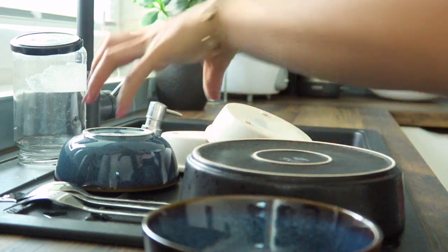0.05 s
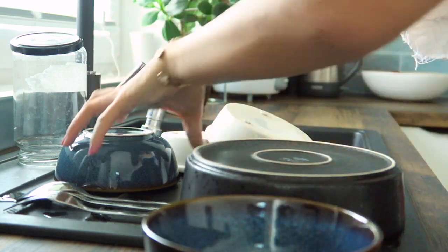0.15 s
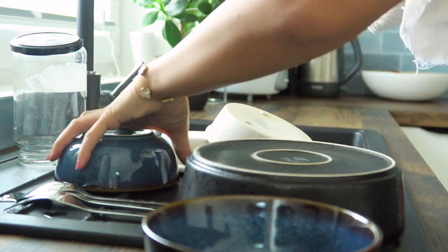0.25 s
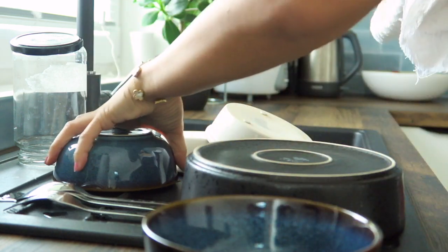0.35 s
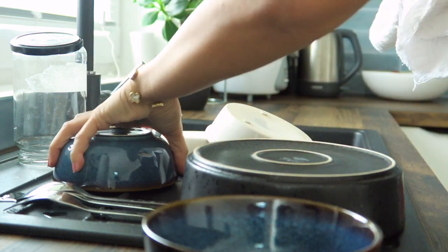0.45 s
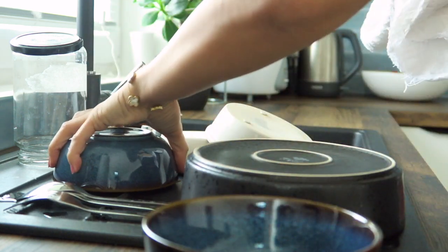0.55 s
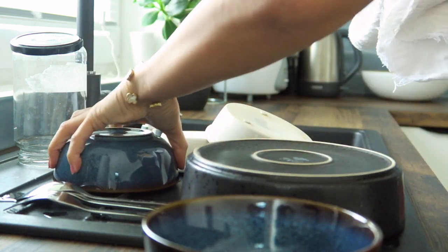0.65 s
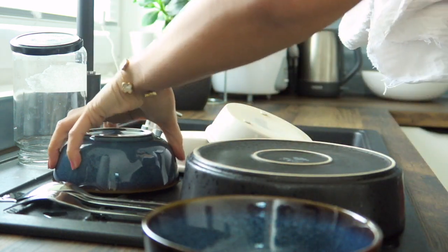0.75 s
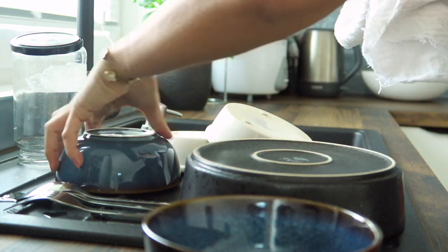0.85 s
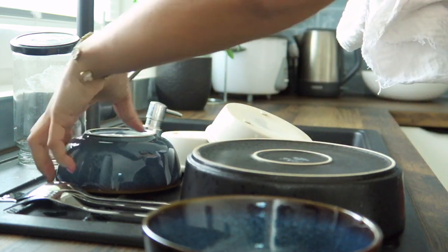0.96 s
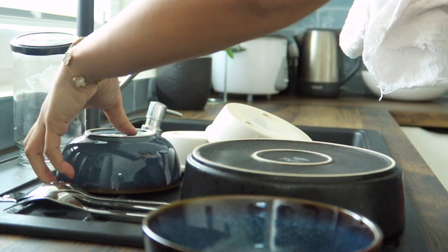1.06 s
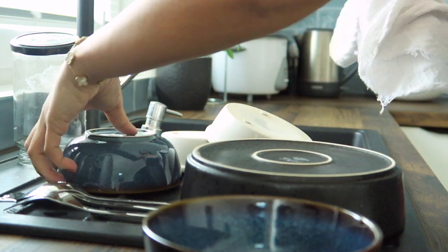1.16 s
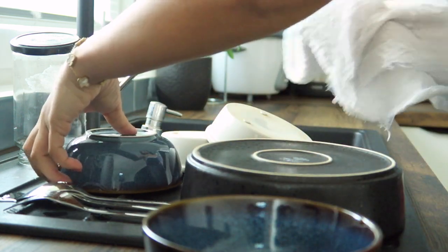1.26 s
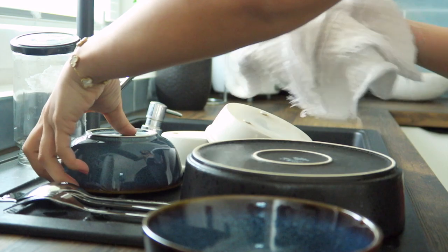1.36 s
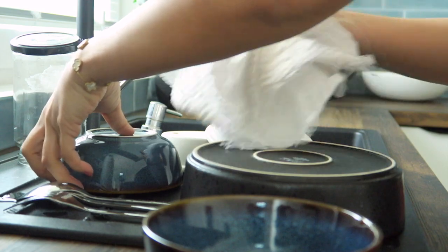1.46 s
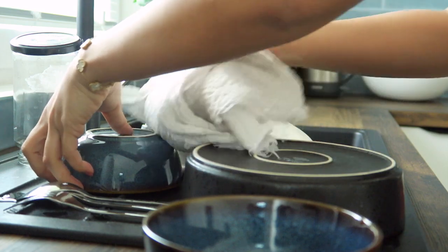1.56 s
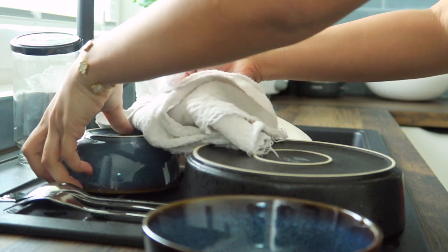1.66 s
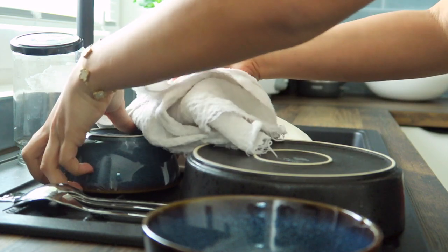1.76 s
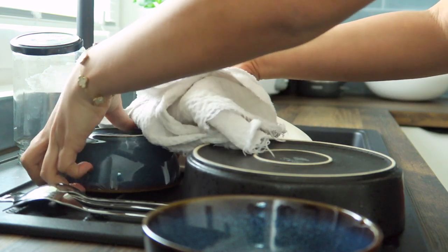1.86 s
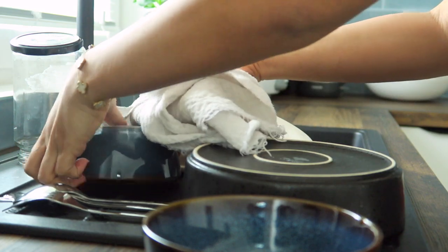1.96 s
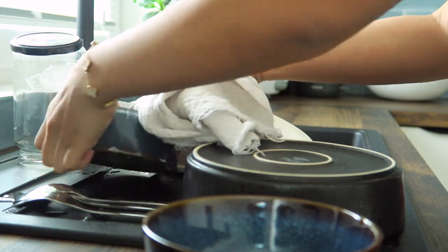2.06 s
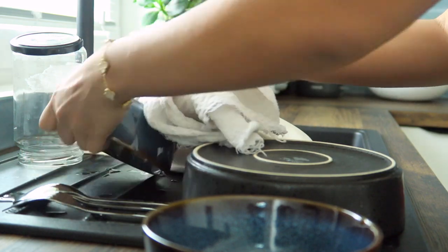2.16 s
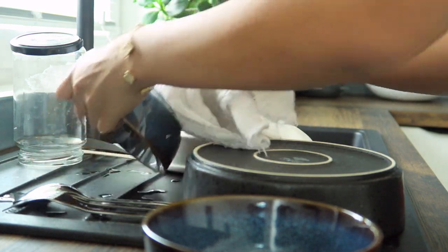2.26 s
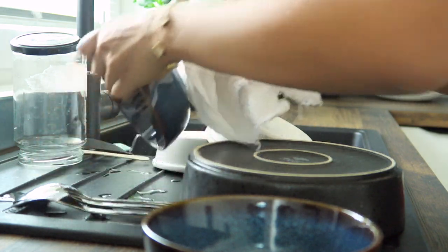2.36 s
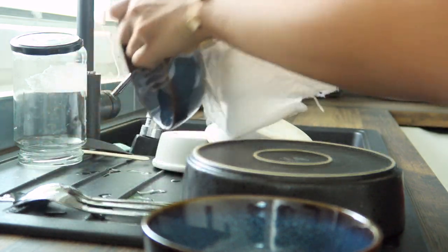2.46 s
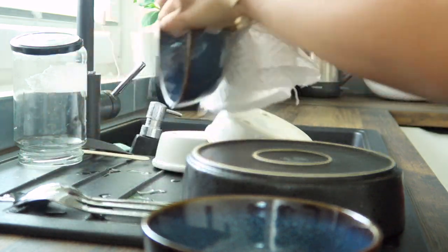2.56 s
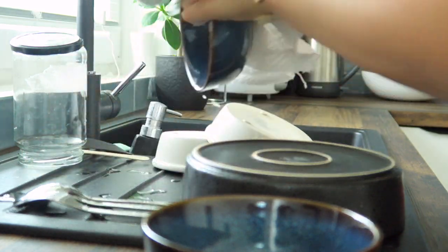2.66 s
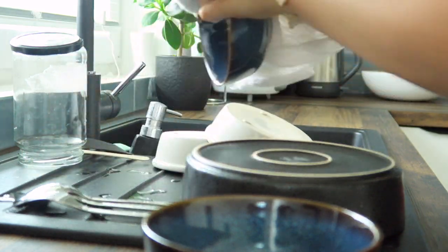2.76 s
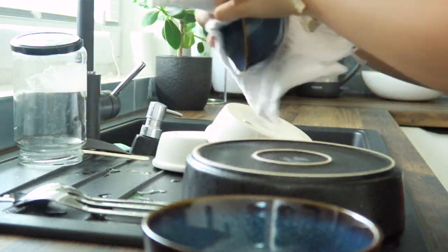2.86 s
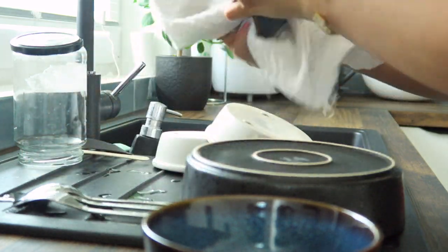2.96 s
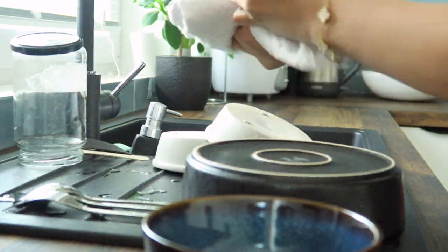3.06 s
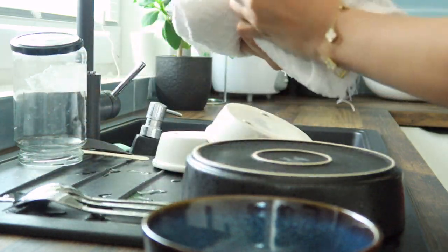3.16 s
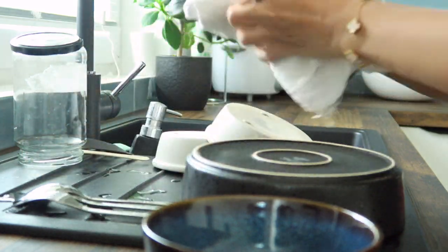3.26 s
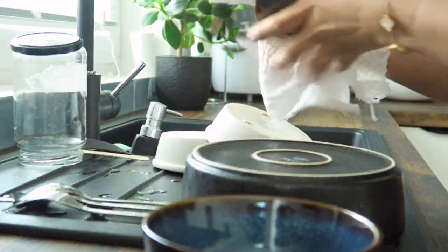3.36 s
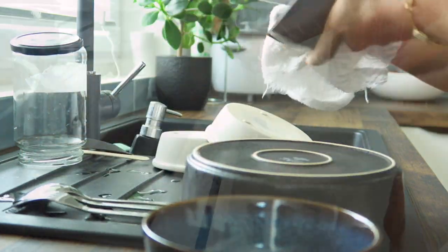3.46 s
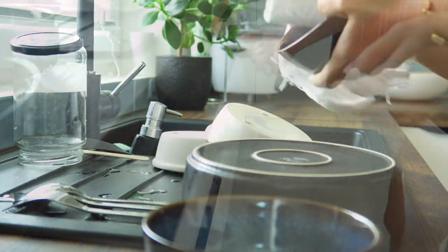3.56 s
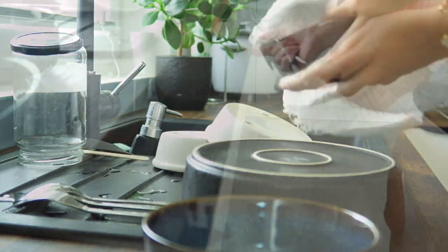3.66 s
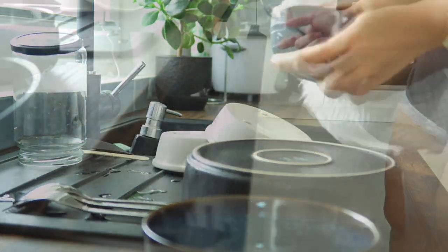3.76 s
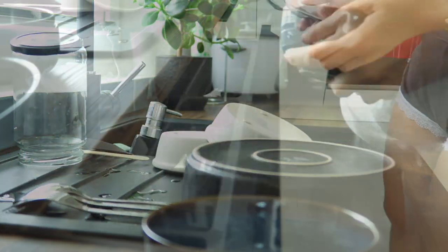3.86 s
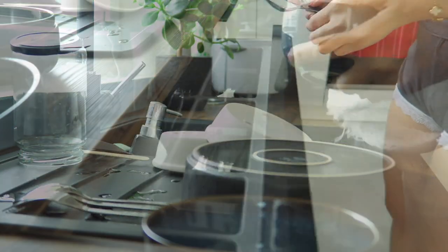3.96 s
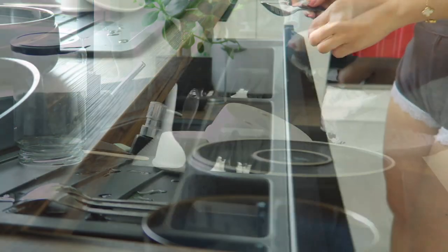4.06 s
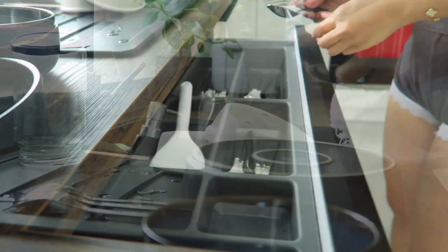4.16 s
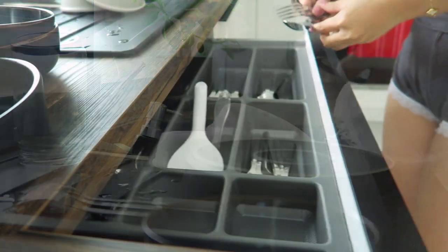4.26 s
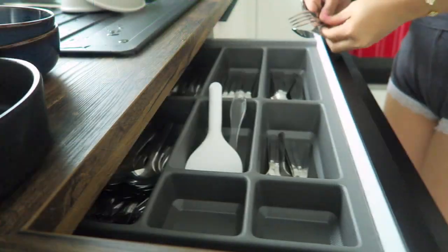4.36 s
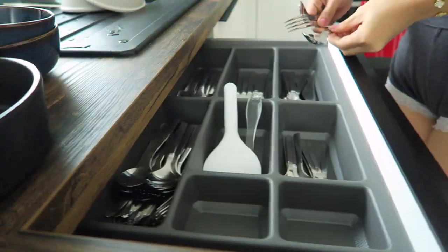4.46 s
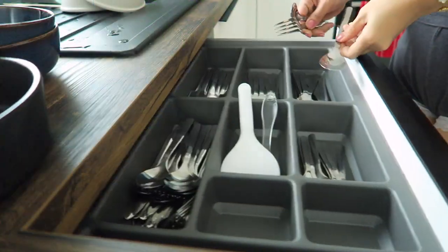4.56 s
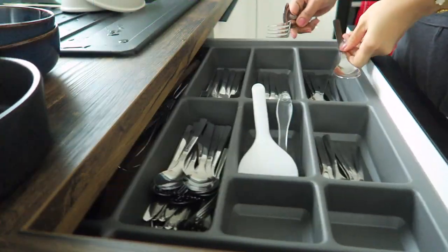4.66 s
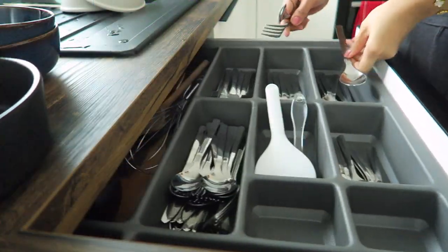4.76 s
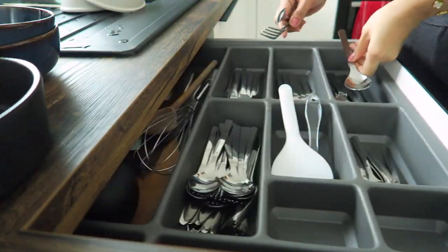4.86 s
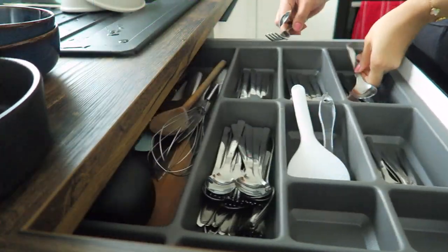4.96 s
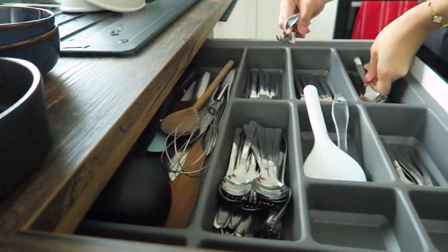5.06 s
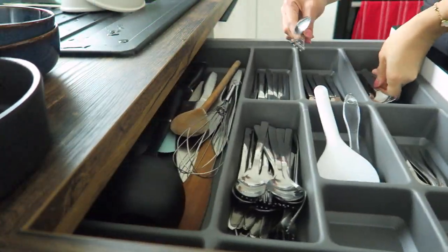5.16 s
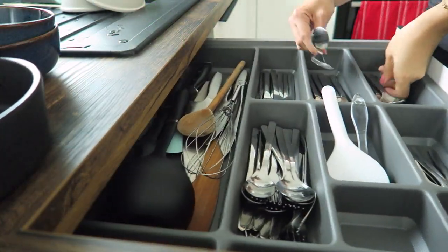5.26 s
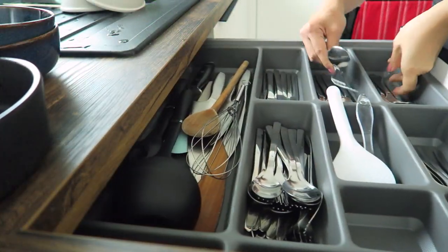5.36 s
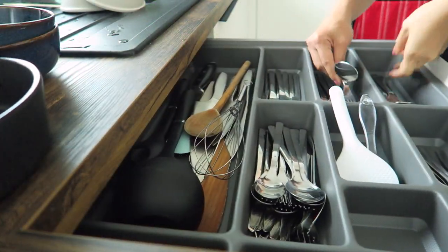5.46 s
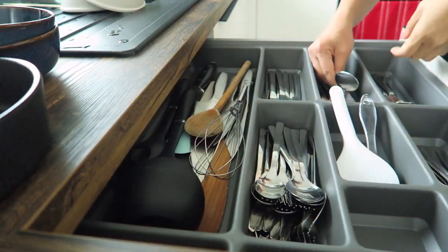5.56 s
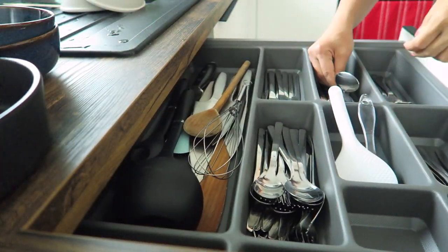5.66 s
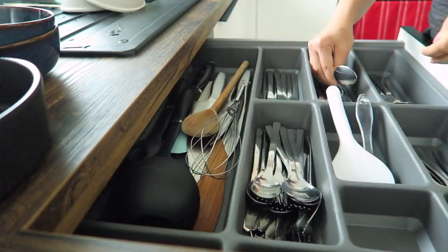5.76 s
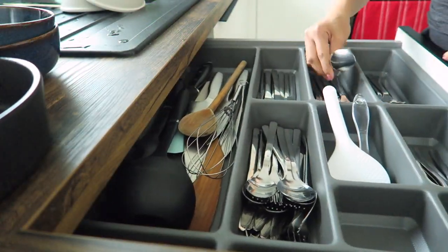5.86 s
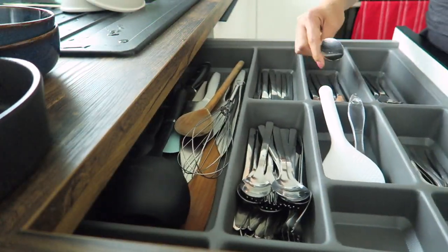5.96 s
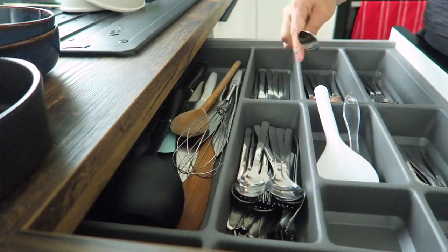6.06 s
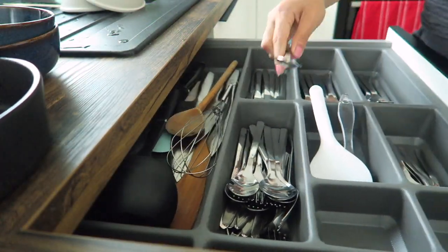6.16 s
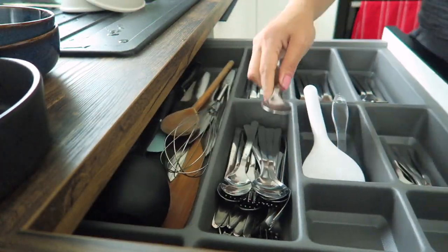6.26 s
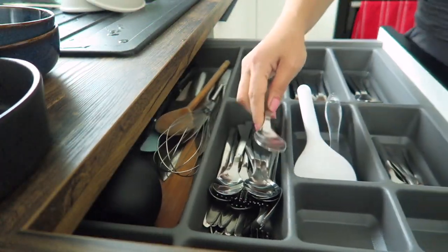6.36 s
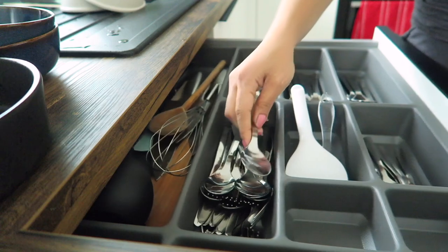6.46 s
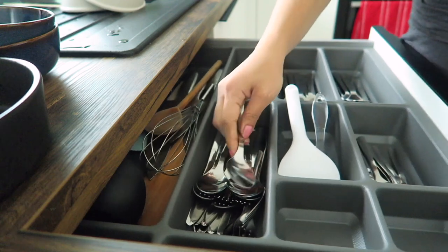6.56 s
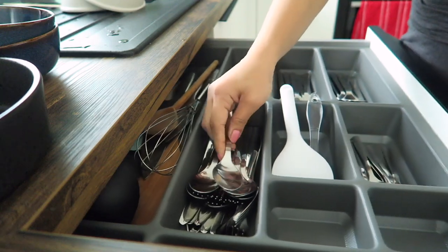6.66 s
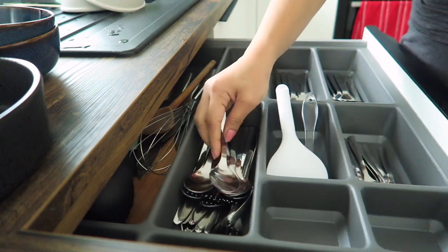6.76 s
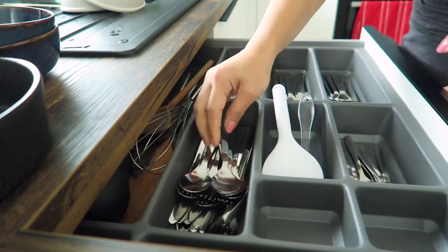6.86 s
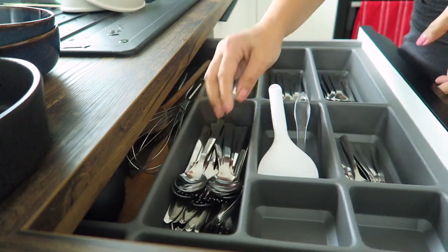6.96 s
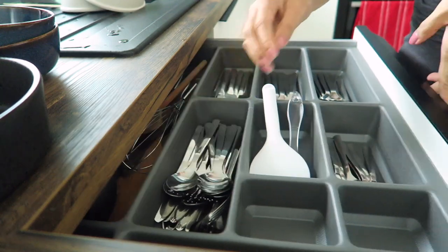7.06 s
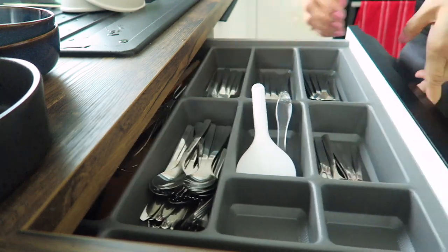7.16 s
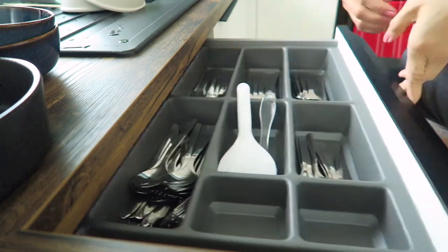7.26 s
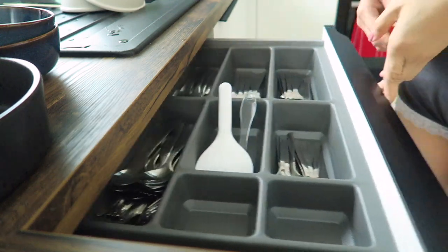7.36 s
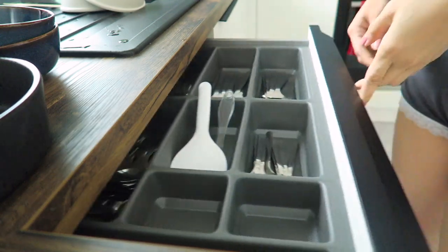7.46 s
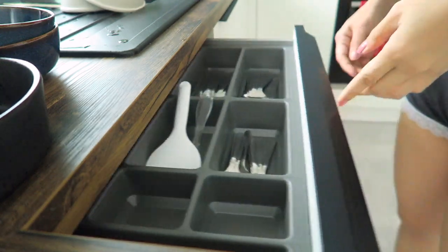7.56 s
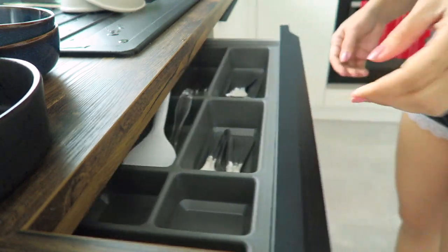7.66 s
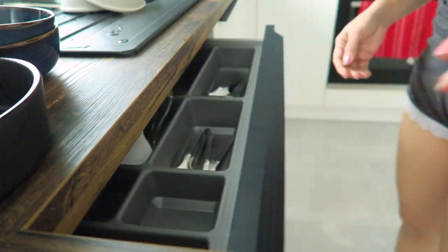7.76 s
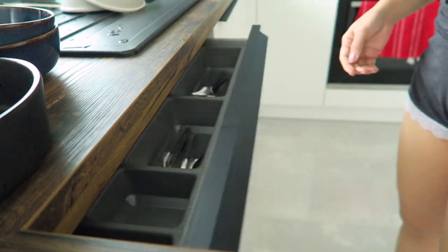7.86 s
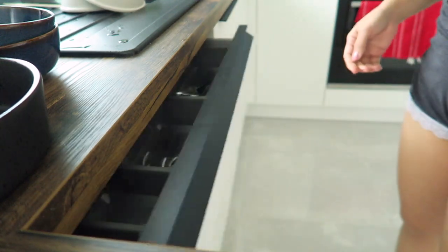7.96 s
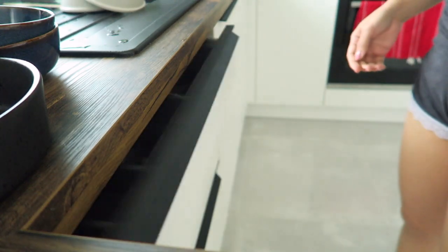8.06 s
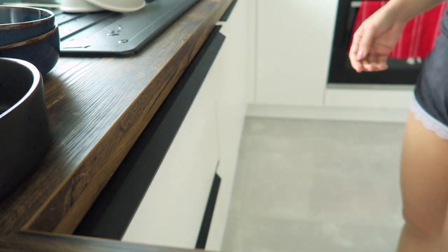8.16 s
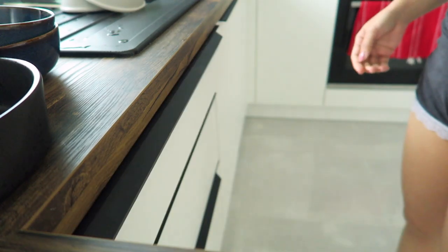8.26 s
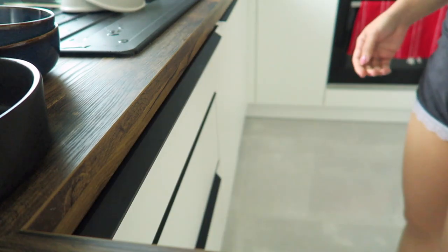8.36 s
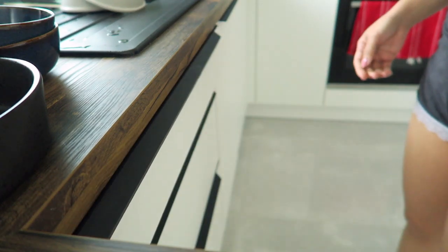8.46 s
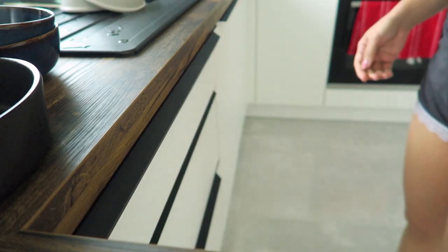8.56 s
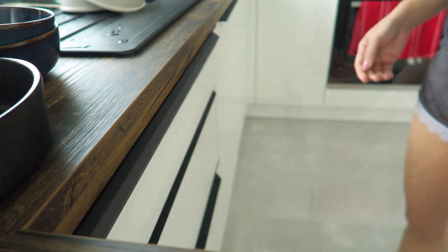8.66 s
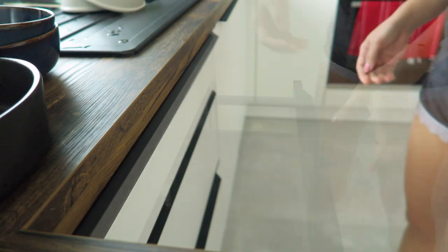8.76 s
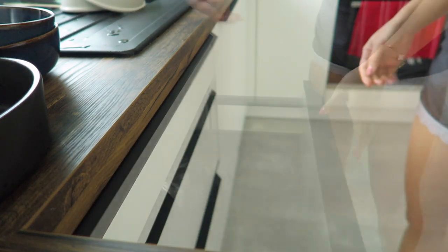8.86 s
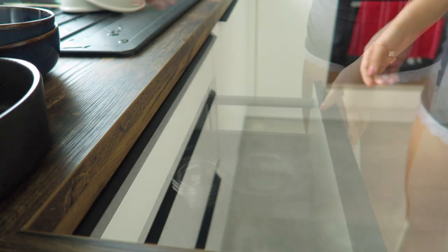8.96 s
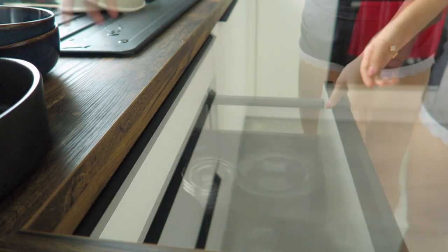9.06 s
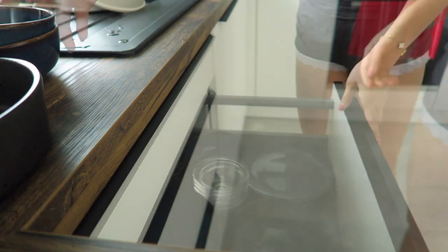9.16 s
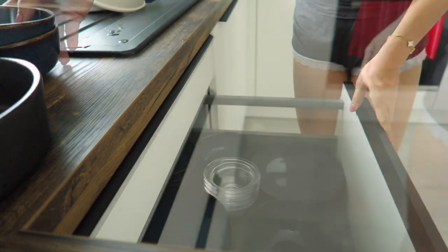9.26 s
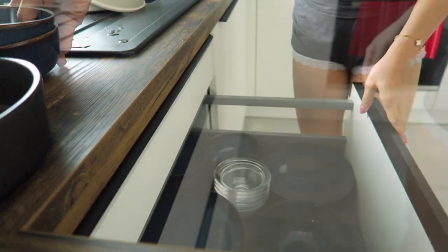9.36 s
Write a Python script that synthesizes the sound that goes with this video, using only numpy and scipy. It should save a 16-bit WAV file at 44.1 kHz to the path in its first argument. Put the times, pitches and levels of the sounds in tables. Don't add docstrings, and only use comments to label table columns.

```python
import sys
import numpy as np
from scipy import signal
from scipy.fft import rfft, irfft, next_fast_len
from scipy.io import wavfile
from scipy.ndimage import uniform_filter1d

SR = 44100
rng = np.random.default_rng(int(sys.argv[2]) if len(sys.argv) > 2 else 0)


def log_audio(samples):
    frames = np.atleast_2d(samples).T
    limited = np.clip(frames, -1, 1)
    pcm = np.round(limited * 32767).astype(np.int16)
    wavfile.write(sys.argv[1], SR, pcm)


def voltage_ratio(decibels):
    exponent = np.asarray(decibels, float) / 20
    return 10 ** exponent


N = 414981

# start_s, level_db (peak), weight_db (lows over it), sparkle_db (highs over it)
BOWL_KNOCKS = [(0.2813, -15.5, 1.5, -61), (0.3424, -37.5, 18.5, -41.5), (0.5531, -7.5, -0.5, -47),
               (0.6194, -29.5, 0.5, -32.5), (0.7362, -9.5, 1.5, -53), (0.8628, -6, 0.5, -42),
               (0.9464, -50.5, 7.5, -22.5), (1.0859, -22, -12.5, -34), (1.1491, -27.5, 2, -20.5),
               (2.1385, -10.5, 0.5, -45), (2.1601, -13.5, 2.5, -44), (2.2217, -37.5, 3.5, -48),
               (2.6324, -45.5, -4, -10)]
RACK_CLINKS = [
    (1.8168, -8.5, -14, -22),
    (1.959, -12.5, -20, -26.5),
]
HAND_CLINKS = [
    (3.562, -44, -24.5, -18),
    (3.752, -21.5, -29.5, -36),
    (3.84, -51, -19.5, -0.5),
    (3.934, -55, -18, -2.5),
    (5.7304, -38, -20, -20),
    (9.167, -33.5, 1, -15),
]
FIRST_FORK = [
    (4.5004, -1.5, -17, -19.5),
    (4.576, -13, -39, -18.5),
    (4.585, -14.5, -40.5, -20.5),
    (4.8853, -32, 5.5, -23.5),
]
KNIFE_DROPS = [
    (5.5455, -17.5, -3, -20.5),
    (5.5489, -5, -2.5, -18),
    (5.8104, -13.5, -7.5, -16.5),
    (5.8395, -14.5, -10.5, -30),
]
FORK_DROPS = [
    (4.177, -44, -26, -2.5),
    (4.93, -58.5, -4.5, -21.5),
    (4.968, -46.5, -2.5, -23.5),
    (5.1832, -8, -9.5, -32),
    (5.2024, -21, -5.5, -13.5),
    (5.3854, -27, 18, -15.5),
    (5.7612, -28, 7.5, -29.5),
    (9.285, -41, 5, -16),
]
TEASPOON_DROPS = [
    (5.8932, 0.5, -2, -14.5),
    (5.915, -16, -2, -6),
    (5.9387, -13.5, -2, -5),
    (6.0842, -32, -15.5, -8),
]
SPOON_DROPS = [
    (6.6987, 3, -16, -22.5),
    (6.7085, -13.5, -17, -21.5),
    (6.7681, -25, -9.5, -39.5),
    (6.8489, -37, -11.5, -3),
    (7.0654, -29.5, -1, -7.5),
    (7.176, -34, -1.5, -2.5),
    (7.1839, -10, 0.5, -11),
    (7.195, -9.5, -4, -14.5),
]
CATCH_KNOCKS = [
    (7.6235, -41, 11, -29),
    (7.8715, -54, -2.5, 1),
    (8.0733, -44, 3, -8),
    (8.1815, -21.5, -23, -36.5),
    (8.2086, -17.5, -10.5, -29),
    (8.2227, -3, -17.5, -26.5),
]

# start_s, level_db (peak), weight_db, sparkle_db, length_s
BOWL_DRAGS = [
    (.6764, -40, 20.5, -19.5, 0.045),
    (1.7114, -29, 5.5, -43, 0.04),
    (1.775, -29, 2.5, -34, .035),
    (1.806, -20, 12.5, -42.5, 0.013),
    (2.098, -22.5, 15, -46, 0.098),
    (2.1744, -22.5, 13.5, -29, 0.086),
]
FORK_SLIDES = [
    (4.05, -46, -29, -1.5, 0.08),
    (4.435, -32.5, -29, 5, 0.063),
    (4.764, -57.5, 3.5, 11, 0.008),
    (5.0947, -17.5, -2.5, -4.5, 0.038),
    (5.310, -17.5, 1.5, -2.5, 0.086),
    (5.3466, -19.5, -18, 1, 0.076),
    (5.4025, -17.5, -12, 2.5, 0.026),
    (4.52, -20.5, -22, -9, .09),
    (4.64, -35.5, -9.5, -6.5, .09),
    (5.08, -44.5, -10, -2.5, .015),
]
SPOON_SLIDES = [
    (6.6747, -13.5, -9, -4.5, 0.029),
    (6.8925, -24.5, -4.5, -4, 0.011),
    (6.918, -8.5, -11, -9, 0.056),
    (7.0416, -15.5, -14, -9.5, 0.029),
    (7.1252, -20.5, -11.5, -8.5, 0.028),
]
DRAWER_BUMPS = [
    (8.2352, -19.5, -1, -14, 0.062),
    (8.2901, -28, -9.5, 2.5, 0.039),
    (8.3788, -31.5, -7, -15.5, 0.037),
    (8.4394, -33, -17.5, -29, 0.088),
    (8.52, -37.5, -14, -25.5, 0.078),
]

# start_s, level_db, pitch_hz, t60_s (time to fall by 60 dB)
THUMP = [(1.516, -22.5, 116.6, 0.27), (1.546, -7, 122, 0.038), (1.591, -29.5, 130, 0.21),
         (4.35, -46, 184, 0.14), (0.741, -27.5, 120, 0.31), (0.868, -26.5, 123, 0.35), (1.3, -30, 70, 0.18),
         (5.39, -22.5, 230, 0.14), (6.676, -21, 230, 0.095), (6.922, -13.5, 220, 0.077),
         (6.94, -35.5, 126, 0.37), (8, -29, 300, .05), (8.215, -35.5, 117, 0.47), (.5535, -16, 1840, .07),
         (5.8935, 2, 1260, 0.035), (5.893, -31, 62, .05), (5.55, -18, 280, .12), (1.8178, -3, 3550, .018),
         (1.959, -12.5, 3480, .05), (7.183, -6, 1150, 0.094), (6.7, -10, 2600, .04),
         (.737, -28.5, 3200, .04), (3.752, -36.5, 1300, .25), (9.167, -33.5, 380, .06),
         (4.5, -14, 420, 0.065), (4.886, -31, 3200, .06), (4.5, -23.5, 490, .1), (5.731, -24, 2900, .025),
         (6.94, -16, 1230, .12), (5.9, -14, 520, .12), (8.185, -24.5, 1950, .06), (8.212, -15, 1900, .08),
         (1.809, -10.5, 592, .15)]

# pitch_hz, level_db, t60_s
BOWL = [(288.5, -15, 0.39), (398.8, -5, 1.2), (486, -1, 0.47), (549, 6, 0.073), (588, -8, 5.0),
        (730, 1, 0.15), (758, -26, 0.71), (1060, 5.5, 0.019), (1093, -40.5, 0.31), (1428, -18, 0.13),
        (1895, -10.5, 0.057), (5114, -35.5, 0.81)]
RACK = [(592, 2, .3), (1030, -6, .12), (1880, -14, .15), (2610, -12, .25), (3130, -8, .35),
        (3550, 10, .025), (3700, -14, .3), (4320, -12, .3), (5110, -24, .2), (7170, -27, .3),
        (10800, -20, .2), (11800, -24, .15), (12600, -18, .08), (14500, -20, .1)]
RIM = [(431, -8, .2), (2680, -13, .25), (3250, -10, .5), (3480, 0, .3), (3550, 6, .03), (4320, -11, .3),
       (6500, -26, .15), (7510, -30, .2), (11600, -19, .2), (12600, -24, .1), (13300, -28, .1)]
HAND = [(1300, -3, .5), (2700, -8, .3), (3150, 2, .35), (5400, -4, .35), (8100, -10, .25),
        (11000, -16, .15)]
LOOSE_FORK = [(1250, -18, 1), (1867, 7, 0.82), (2590, 2.5, 0.24), (3038, 3.5, 0.82), (3345, 5, 0.57),
              (4050, -12, 0.31), (5070, -1.5, 0.48), (6300, -3.5, .15)]
KNIFE = [(500, -5.5, .3), (883, -3.5, .3), (1270, -4, .3), (2320, -7.5, .3), (2620, -8.5, .3),
         (3000, -11.5, .25), (3670, -13.5, .2), (5170, -22, .3), (7200, -19.5, 0.36), (9190, -27, .2),
         (11400, -23.5, .2), (13900, -29, .15)]
FORKS = [(437, -9.5, 0.8), (1264, -10.5, 0.38), (1847, -16.5, 0.093), (3230, -19, 5.0), (3860, 6, 0.12),
         (5300, -4.5, 0.19), (6530, -11.5, 0.28), (8040, -16.5, 0.238), (11400, -8, 0.87),
         (12900, -16, 0.19), (13660, -11.5, 0.24)]
TEASPOON = [(3978, -14, .25), (5265, -12, .5), (7321, -12, .6), (7822, -22, .4), (9211, -10, .55),
            (9615, -18, .4), (11610, 0, .26), (11780, -5, .3), (12400, -16, .3), (13790, -4, .3),
            (14320, -14, .4)]
SPOONS = [(1056, -16, .3), (1230, 0, .13), (2600, -3, .07), (3400, -3, .07), (3930, -15, .08),
          (5200, -11, .3), (7300, -14, .15), (9250, -6, .16), (10630, -14, .2), (11700, -4, .18),
          (12400, -12, .15), (13700, -2, .18), (14640, -16, .13)]
DRAWER = [(233, -7.5, 1.2), (1300, -28, .3), (3340, -34.5, 5.0), (4400, -23.5, 0.058), (10480, -39, 5.0),
          (11660, -21.5, 5.0)]
CATCH = [(245, -9, 0.19), (1174, -18.5, 0.071), (1955, -4, 0.076), (2230, -19.5, 0.089),
         (3300, -27.5, 0.074)]
FREE_BOWL = [(1545, -41, 2.2), (1674, -42, 2.2), (8818, -33, .4), (8830, -38, .3)]
FREE_SPOON = [(1534, -36, 1.8), (3940, -45, 1.6), (3985, -43, 1.6), (6780, -48, 1.6), (10000, -58, 1.5)]

# pitch_hz, level_db (per Hz)
BOARD_CRACK = [(35, -53.5), (60, -25.5), (118, -14), (432, 2.5), (571, -5), (704, 2), (828, -7.5),
               (3190, -30), (3660, -46), (15500, -88.5)]
RACK_CRACK = [(100, -40), (500, -7), (1500, -24), (2200, -16.5), (3300, 1), (4400, -14), (5500, -26),
              (14000, -24)]
TRAY_CRACK = [(35, -71), (60, -49), (118, -4.5), (343, 3.5), (376, 12.5), (975, 5), (1230, 4.5),
              (1660, -1.5), (3930, -14), (8070, -23), (12000, -24), (14200, -26), (14900, -34.5)]

# start_s, level_db
ROLL = [
    [(3.3, -62), (4.442, -42), (5.1, -41.5)],
    [(7.2, -61), (7.6, -43.5), (8.25, -41.5), (8.7, -74)],
    [(8.7, -66), (8.822, -65), (9.41, -43)],
]
# start_s, level_db
WIPE = [(2.45, -51), (3.544, -53.5), (3.9, -53)]
# start_s, level_db
RUMBLE = [
    [(0.0, -50.5), (3.0, -56.5), (4.4, -44), (5.33, -46), (5.7, -47)],
    [(5.6, -80.5), (5.99, -74.5), (8.8, -74)],
    [(8.7, -69.5), (9.01, -53), (9.41, -42.5)],
]

# pitch_hz, level_db (per Hz)
ROLL_COLOUR = [(29, -60), (50, -14), (169, -7), (238, 3), (920, -13), (1330, -17.5), (1750, -25),
               (5140, -30), (12000, -55), (15600, -84)]
WIPE_COLOUR = [(120, -21.5), (200, 2.5), (366, -4), (532, -37), (1060, -11), (1290, -24), (3090, -16),
               (14000, -41)]
RUMBLE_COLOUR = [(12, -52), (20, -14.5), (54, -10), (95, -4.5), (125, 1.5), (155, -13), (250, 0),
                 (320, -50), (550, -120)]
AIR = [(59, -48), (100, -31), (237, -10.5), (386, 5), (614, -4.5), (1040, -7.5), (2090, -10), (5060, -20),
       (11800, -30.5), (13600, -37), (15500, -66.5)]

# pitch_hz, likeness (1 = same, -1 = opposite)
AIR_ALIKE = [(60, 0.853), (180, -0.88), (550, 0.023), (1650, 0.55), (4970, -0.25), (15000, -0.1)]
# pitch_hz, level_db (left-right difference over the middle)
SIDE_SHARE = [(60, -22), (150, -15), (380, -14), (950, -19), (1600, -22), (3000, -14), (5980, -4),
              (15000, -1)]
# pitch_hz, t60_s
ROOM = [(100, 1), (400, 0.69), (1500, 0.51), (5000, 0.54), (12000, 0.37)]

RING_SIZE = 8192
WEIGHT_DB, SPARKLE_DB = 3.5, 12.5
PIECE_SPREAD = .012
STIR_DB = 5
LUMP_DB = 4
RATTLE_S = .025


def evened(x):
    return x / np.sqrt(np.mean(x ** 2) + 1e-20)


def read(points, hz):
    f, value = np.transpose(points)
    return np.interp(np.log(hz + 1), np.log(f + 1), value)


def add(mix, s, sound):
    part = mix[round(s * SR):][:len(sound)]
    part += sound[:len(part)]


def coloured(x, colour):
    size = x.shape[-1]
    gain = voltage_ratio(read(colour, np.fft.rfftfreq(size, 1 / SR)))
    return irfft(rfft(x) * gain, size)


def rings(modes, held, spread, count, size):
    hz, db, t60 = np.repeat(modes, count, axis=0).T[:, :, None]
    t = np.arange(size) / SR
    hz = hz * (1 + spread * rng.uniform(-1, 1, hz.shape))
    return voltage_ratio(db - 60 * t / (held * t60)) * np.sin(2 * np.pi * hz * t)


def blows(rows, modes, crack, held, spread, ring_db, crack_t60, per_s, rise, chatter_db,
          chatter_s=1, low_hz=190, first=1, rattle=0):
    out, t = np.zeros(N), np.arange(RING_SIZE) / SR
    damped = np.minimum(modes, [SR, 99, .6])
    tones = rings(damped, held, spread, count=10, size=RING_SIZE)
    tones = tones * np.cos(np.pi / 2 * t / t[-1])
    edges = [1200, 4500], [low_hz, 1200], [4500, 20000]  # middle, lows, highs in Hz
    bands = [signal.butter(2, edge, "band", fs=SR) for edge in edges]
    rising = np.minimum(t / 0.00033, 1)
    fade = rising * voltage_ratio(-60 * t / crack_t60)
    for s, db, weight_db, sparkle_db, *length in rows:
        noise = rng.standard_normal(RING_SIZE + 4096)
        strength, draw = rng.standard_normal(4097), rng.random(4098)

        u = t[:len(strength)] / (chatter_s * np.prod(length))
        touches = strength * (draw[1:] < per_s / SR)
        chatter = voltage_ratio(chatter_db) * touches * (1 - np.exp(-u / rise)) * np.exp(-u ** 3) / 2
        chatter[0] = first

        lumps = voltage_ratio(LUMP_DB * evened(uniform_filter1d(noise[:6145], size=90)))
        dull = evened(coloured(irfft(rfft(noise) * lumps), crack))
        dull = dull * np.sqrt(abs(signal.fftconvolve(chatter ** 2, fade ** 2)))

        stirred = np.repeat(voltage_ratio(STIR_DB * (2 * draw[-len(modes):] - 1)), len(tones) // len(modes))
        mixed = stirred * rng.standard_normal(len(tones)) @ tones
        piece = 1 + PIECE_SPREAD * (2 * draw[0] - 1)
        ring = np.interp(t * piece, t, mixed, right=0)
        ring = voltage_ratio(ring_db) * rising * ring / abs(ring).max()

        loose = rattle * np.minimum(np.arange(len(noise)) / (RATTLE_S * SR), 1)
        shaken = 1 - loose + loose * evened(uniform_filter1d(noise[::-1], size=200))
        sound = dull + shaken * signal.fftconvolve(ring, chatter)

        parts = [signal.lfilter(*band, sound) for band in bands]
        parts[0] = -parts[0]
        peaks_db = db, db + weight_db + WEIGHT_DB, db + sparkle_db + SPARKLE_DB
        add(out, s, sum(voltage_ratio(peak) * p / abs(p).max() for peak, p in zip(peaks_db, parts)))
    return out


def swinging(modes, swell_s, hurry=1):
    t, hz = np.arange(SR) / SR, np.array(modes)[:, :1]
    turned = np.minimum(t / swell_s * (hz / 1500) ** hurry, 1) ** 2
    turned = turned * np.cos(np.pi / 2 * t ** 4)
    return (turned * rings(modes, held=1.0, spread=0, count=1, size=SR)).sum(0)


def bowl():
    out = blows(BOWL_KNOCKS, BOWL, BOARD_CRACK, held=0.085, spread=0.056, ring_db=4.5, crack_t60=0.11,
                per_s=350, rise=0.019, chatter_db=-2, chatter_s=0.01, low_hz=85)
    out += blows(BOWL_DRAGS, BOWL, BOARD_CRACK, held=0.26, spread=0.039, ring_db=5.5, crack_t60=0.036,
                 per_s=2500, rise=0.6, chatter_db=9.5, first=.05)
    out += blows(RACK_CLINKS[:1], RACK, RACK_CRACK, held=0.4, spread=0.025, ring_db=1, crack_t60=0.05,
                 per_s=2500, rise=0.12, chatter_db=-19, chatter_s=.035, rattle=.4)
    out += blows(RACK_CLINKS[1:], RIM, RACK_CRACK, held=0.4, spread=0.022, ring_db=6, crack_t60=0.03,
                 per_s=2500, rise=0.05, chatter_db=-16, chatter_s=.025, first=.6, rattle=.45)
    add(out, RACK_CLINKS[0][0], swinging(FREE_BOWL, swell_s=.15))
    return out


def thumps():
    out, t = np.zeros(N), np.arange(SR // 2) / SR
    for s, db, hz, t60 in THUMP:
        swell = np.minimum(t * hz, 1) ** 2
        add(out, s, swell * voltage_ratio(db - 60 * t / t60) * np.sin(2 * np.pi * hz * t))
    return out


def cutlery():
    out = blows(HAND_CLINKS, HAND, TRAY_CRACK, held=0.14, spread=.035, ring_db=4, crack_t60=0.02,
                per_s=900, rise=.1, chatter_db=-12, chatter_s=.018, rattle=.4)
    out += blows(FIRST_FORK, LOOSE_FORK, TRAY_CRACK, held=0.18, spread=0.057, ring_db=-1.0, crack_t60=0.053,
                 per_s=2400, rise=0.15, chatter_db=-16.5, chatter_s=0.03, rattle=.4)
    out += blows(KNIFE_DROPS, KNIFE, TRAY_CRACK, held=0.2, spread=0.02, ring_db=2.5, crack_t60=0.03,
                 per_s=2100, rise=0.1, chatter_db=-7, chatter_s=0.026, rattle=.5)
    out += blows(FORK_DROPS, FORKS, TRAY_CRACK, held=0.11, spread=0.27, ring_db=-8.5, crack_t60=0.12,
                 per_s=1200, rise=0.097, chatter_db=-18.5, chatter_s=0.031)
    out += blows(FORK_SLIDES, FORKS, TRAY_CRACK, held=0.12, spread=0.05, ring_db=-13, crack_t60=0.01,
                 per_s=4500, rise=0.012, chatter_db=1, first=1.4, rattle=.55)
    out += blows(TEASPOON_DROPS, TEASPOON, TRAY_CRACK, held=0.28, spread=0.013, ring_db=-10, crack_t60=0.018,
                 per_s=4000, rise=.15, chatter_db=-21, chatter_s=.045, low_hz=300, rattle=.45)
    out += blows(SPOON_DROPS, SPOONS, TRAY_CRACK, held=0.2, spread=0.03, ring_db=-10, crack_t60=0.02,
                 per_s=4000, rise=0.07, chatter_db=-17, chatter_s=.02, rattle=.45)
    out += blows(SPOON_SLIDES, SPOONS, TRAY_CRACK, held=0.2, spread=0.025, ring_db=-9, crack_t60=0.016,
                 per_s=5000, rise=0.008, chatter_db=-3, first=2, rattle=.45)
    add(out, TEASPOON_DROPS[0][0], swinging(FREE_SPOON, swell_s=.42, hurry=.25))
    return out


def drawer_bumps():
    out = blows(CATCH_KNOCKS, CATCH, TRAY_CRACK, held=0.11, spread=0.081, ring_db=13.5, crack_t60=0.024,
                per_s=2600, rise=0.041, chatter_db=-9.5, chatter_s=0.037)
    out += blows(DRAWER_BUMPS, DRAWER, TRAY_CRACK, held=0.086, spread=0.059, ring_db=-13.5, crack_t60=0.012,
                 per_s=2200, rise=0.078, chatter_db=-0.5)
    return out


def ports(x):
    size = next_fast_len(N)
    wander = evened(uniform_filter1d(rng.standard_normal(size // 2 + 1), size=3000))
    lead = -.7 + .7 * wander
    difference = irfft(1j * lead * rfft(x, size), size)
    return np.array([x, coloured(difference, SIDE_SHARE)[:N]])


def room(x):
    taps = np.zeros((2, SR))
    at = np.arange(200, SR - 20, 20) + rng.integers(0, 20, (2, (SR - 201) // 20))
    np.put_along_axis(taps, at, rng.choice([-1., 1.], at.shape), 1)
    hz, t, z = signal.stft(taps, SR, nperseg=512)
    z[1] *= voltage_ratio(read(SIDE_SHARE, hz) - 3.0)[:, None]
    dying = voltage_ratio(-60 * t / read(ROOM, hz)[:, None])
    tail = signal.istft(z * dying, SR, nperseg=512)[1]
    return signal.fftconvolve(x[None], tail / np.linalg.norm(tail[0]), axes=1)[:, :N]


def level(tables):
    t, gain = np.arange(N) / SR, np.zeros(N)
    for rows in tables:
        s, db = np.transpose(rows)
        ends = np.clip(np.minimum(t - s[0], s[-1] - t) * 20, 0, 1)
        gain += voltage_ratio(np.interp(t, s, db)) * ends
    return gain


def rustle(colour, alike, patchy_db, flicker_db):
    frames, hz = N // 512 + 4, np.fft.rfftfreq(1024, 1 / SR)
    a, b, c, d, patches = rng.standard_normal((frames, 513, 5)).T
    patches = uniform_filter1d(patches, size=12, axis=0)
    patches = evened(uniform_filter1d(patches, size=5, axis=1))
    flicker = evened(uniform_filter1d(rng.standard_normal(frames), size=2))
    same = np.clip(read(alike, hz), -1, 1)[:, None]
    left = a + 1j * b
    right = same * left + np.sqrt(1 - same ** 2) * (c + 1j * d)
    gain = voltage_ratio(read(colour, hz)[:, None] + patchy_db * patches + flicker_db * flicker)
    z = np.array([left, right]) * gain
    return evened(signal.istft(z, window="cosine", nperseg=1024, noverlap=512)[1][:, :N])


def drawer_runners():
    alike = [(100, 1.0), (4000, 0.63)]  # pitch_hz, likeness
    return level(ROLL) * rustle(ROLL_COLOUR, alike, patchy_db=0.0, flicker_db=2.5)


def towel():
    return level([WIPE]) * rustle(WIPE_COLOUR, AIR_ALIKE, patchy_db=1.5, flicker_db=1.5)


def draught():
    alike = [(30, .98), (150, .9)]  # pitch_hz, likeness
    return level(RUMBLE) * rustle(RUMBLE_COLOUR, alike, patchy_db=1.5, flicker_db=0.7)


def air():
    return voltage_ratio(-53.5) * rustle(AIR, AIR_ALIKE, patchy_db=1.5, flicker_db=.8)


def scene():
    near = bowl() + thumps() + cutlery() + drawer_bumps()
    mid, side = voltage_ratio(-4.0) * ports(near) + voltage_ratio(-11.5) * room(near)
    stereo = np.array([mid + side, mid - side])
    return stereo + drawer_runners() + towel() + draught() + air()


def band_limit(x):
    return signal.sosfilt(signal.butter(12, 15620, fs=SR, output="sos"), x)


def record(dry):
    loudest = np.clip(dry, -1, 1)
    edge = signal.firwin(255, 15550, window=("kaiser", 9), fs=SR)[None]  # low-pass, edge in Hz
    mix = signal.oaconvolve(loudest, edge, "same")
    return band_limit(mix)


dry = scene()
out = record(dry)
log_audio(out)
```